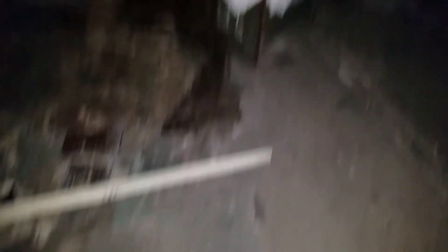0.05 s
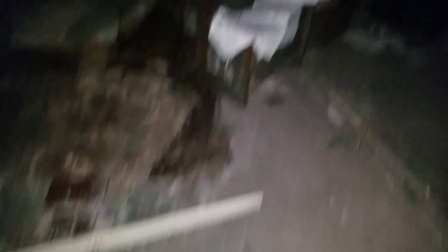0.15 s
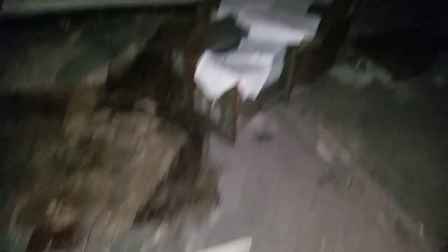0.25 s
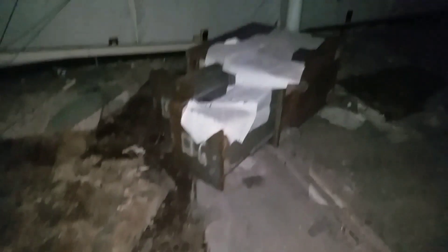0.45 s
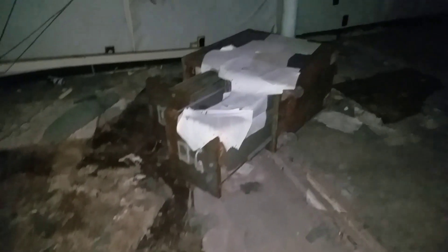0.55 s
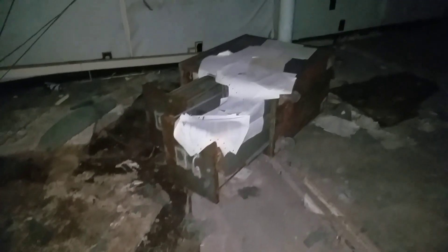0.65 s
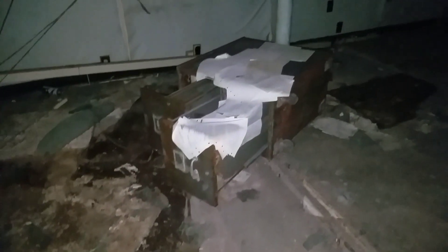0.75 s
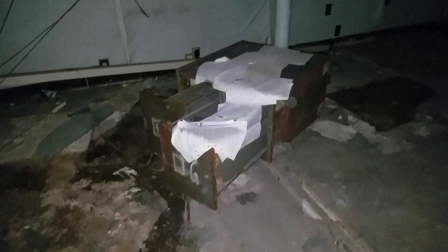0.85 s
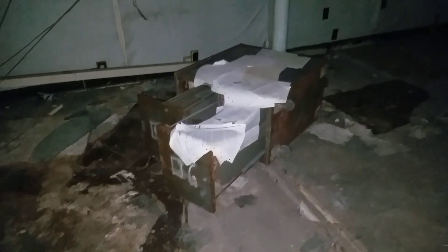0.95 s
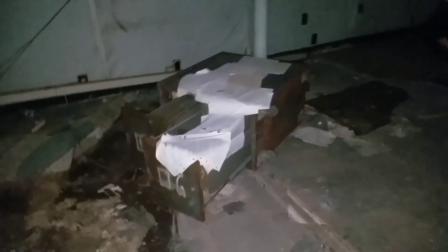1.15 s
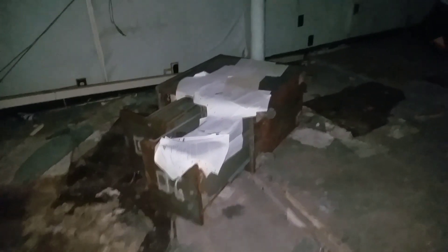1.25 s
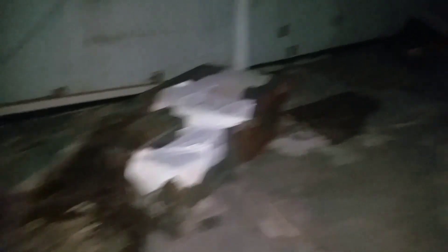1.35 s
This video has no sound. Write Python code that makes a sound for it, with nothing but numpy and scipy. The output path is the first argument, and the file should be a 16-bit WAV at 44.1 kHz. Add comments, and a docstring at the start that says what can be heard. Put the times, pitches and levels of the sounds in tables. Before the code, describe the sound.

Close by, a shoe breaks dry fragments on a hard floor, sharp snaps ringing off bare walls; the echo fades to near silence before a faint dry click, soft knock and short scuff.

```python
"""A shoe comes down on brittle debris on bare concrete: noise-burst fractures ring short modes, ticks settle.
Later the other foot shifts with a dry snap, a soft knock of decaying sines and a short scuff of noise.
A large empty room answers with diffuse noise tails that follow the power of each band.
Beneath lie a quiet air floor, a faint far hum and, at the start, the dying echo of an earlier step."""
import sys
import numpy as np
from scipy import signal
from scipy.io import wavfile
from scipy.ndimage import uniform_filter1d

SR = 44100
rng = np.random.default_rng(int(sys.argv[2]) if len(sys.argv) > 2 else 0)


def store_wav(level_fs):
    """Save 16-bit WAV to argv[1]."""
    pcm = np.round(np.clip(np.atleast_2d(level_fs), -1, 1) * 32767)
    wavfile.write(sys.argv[1], SR, pcm.T.astype(np.int16))


def volts_from_db(level):
    """Convert decibel levels to linear amplitude ratios."""
    exponent = np.asarray(level, float) / 20
    return 10 ** exponent


N = 61739

# decay of the empty room: (f/Hz, t60/s)
ROOM_T60 = [(300, 0.86), (1200, 0.6), (2500, 0.6), (15000, 0.56)]


def read(points, hz):
    """Reads a table on a log-frequency axis."""
    f, value = np.transpose(points)
    return np.interp(np.log(hz + 1), np.log(f + 1), value)


def curve(points):
    """Turns a (t/s, level/dB) curve into gain per sample."""
    s, db = np.transpose(points)
    return volts_from_db(np.interp(np.arange(N) / SR, s, db, left=-120))


def evened(x):
    """Sets rms to 1."""
    return x / np.sqrt(np.mean(x ** 2) + 1e-20)


def add(mix, s, sound, pan_db):
    """Places a two-channel sound; pan_db is left over right."""
    part = mix[:, round(s * SR):][:, :sound.shape[1]]
    part += sound[:, :part.shape[1]] * volts_from_db([[pan_db / 2], [-pan_db / 2]])


def diffuse(tone, decays=None, patchy_db=0., size=512, pan=None, shape=1):
    """Two-channel noise from random short-time spectra, alike in the bass, optionally dying by band."""
    # left-right likeness of diffuse sound: (f/Hz, correlation)
    likeness = [(60, 0.98), (380, 0.68), (2380, -0.13), (15000, -0.033)]
    hop = size // 4
    frames, hz = N // hop + 5, np.fft.rfftfreq(size, 1 / SR)
    a, b, c, d, patches = rng.standard_normal((frames, len(hz), 5)).T
    same = np.clip(read(likeness, hz), -1, 1)[:, None]
    left, other = a + 1j * b, c + 1j * d
    z = np.array([left, same * left + np.sqrt(1 - same ** 2) * other])
    patches = uniform_filter1d(patches, size=12, axis=0)  # over frequency
    patches = uniform_filter1d(patches, size=8, axis=1)  # over time
    db = read(tone, hz)[:, None] + patchy_db * evened(patches)
    if pan:
        z *= volts_from_db(np.array([.5, -.5])[:, None, None] * read(pan, hz)[:, None])
    if decays:
        db = db - 60 * np.arange(frames) * hop / SR / read(decays, hz)[:, None]
    return signal.istft(z * volts_from_db(db) * shape, nperseg=size, noverlap=size - hop)[1][:, :N]


def air():
    """Still air and hiss: steady coloured noise."""
    # floor colour: (f/Hz, level/dB per Hz)
    air_tone = [(14, -38), (40, -5.5), (60, -5.5), (110, -12.5), (140, -9), (200, -13.5), (330, -10.5),
                (900, -20), (2000, -14), (3200, -24.5), (6000, -29.5), (9500, -35.5), (13000, -28.5),
                (15800, -32.5)]
    # floor balance: (f/Hz, left-right/dB)
    air_pan = [(100, -0.5), (3000, 6), (15000, -1)]
    rms_db = -57.5
    return volts_from_db(rms_db) * evened(diffuse(air_tone, size=2048, pan=air_pan))


def far_hum():
    """Faint sines whose phase wanders; each fades at 60 dB/s after its hold."""
    # hum partials, sine peak 1 dB above level: (f/Hz, level/dB, hold/s)
    partials = [(95.8, -63, 0.573), (331.6, -66.5, 0.81)]
    t, hum = np.arange(N) / SR, 0
    wander_rad = 0.94  # rms before the last smoothing
    for hz, db, until in partials:
        wander = wander_rad * evened(uniform_filter1d(rng.standard_normal(N), size=4000))
        phase = 2 * np.pi * hz * t + uniform_filter1d(wander, size=800)
        hum += volts_from_db(db + 1 - 60 * np.maximum(t - until, 0)) * np.sin(phase)
    return hum


def earlier_echo():
    """The echo of an earlier step: diffuse noise dying at the room's decay from the start."""
    # echo colour: (f/Hz, level/dB per Hz)
    echo_tone = [(59, -49), (100, -3), (1730, -7), (1880, -6), (15500, -42.5)]
    start_rms_db = -49
    echo = diffuse(echo_tone, ROOM_T60)
    return echo * volts_from_db(start_rms_db) / np.sqrt(np.mean(echo[:, :2000] ** 2))


def crack(ring_hz, body_hz, body_db, treble_db, top_db, crumble_ms, free):
    """A burst of tiny fractures rings the debris modes, the nearest two moved to the fragment's own pitches."""
    # debris modes: (f/Hz, level/dB, time/s to fall 90 dB at free = 1, left phase lead/rad)
    debris_modes = [(470, -8, 0.015, 1), (793, 1.5, 0.012, 0.23), (1262, -4, 0.018, 0.8),
                    (1808, -4.5, 0.013, 0.4), (2247, 4.5, 0.0089, -0.6), (2815, -0.5, 0.011, -0.5),
                    (3510, 1, 0.0089, 0.89), (4368, -1, 0.0059, 2.5), (4930, -5.5, 0.0036, 3.5),
                    (5820, 3, 0.0016, 1.64), (6936, 5, 0.0029, -1.2), (9170, -5.5, 0.0064, 2),
                    (12050, 2.5, 0.002, -1), (13270, 0.5, 0.0036, 5), (14650, -2.5, 0.013, 0.8)]
    body_below_hz, treble_above_hz, top_above_hz = 1400, 4400, 11000
    off_ring_db_per_oct, off_body_db_per_oct = 29.5, 10.5
    detune, turn_spread_rad = .02, 0.6
    t = np.arange(1400) / SR
    u = t * 1000 / max(crumble_ms, .05)
    burst = u ** 2 * np.exp(-2 * u) * rng.standard_normal(len(t))
    out = np.zeros((2, len(t)))
    chance = rng.standard_normal((len(debris_modes), 2))
    modes = np.array(debris_modes)
    for own_hz in (ring_hz, body_hz):
        modes[np.argmin(abs(np.log(modes[:, 0] / own_hz))), 0] = own_hz
    for (hz, db, fall_s, lead), (a, b) in zip(modes, chance):
        if hz < body_below_hz:
            db = db + body_db - off_body_db_per_oct * abs(np.log2(hz / body_hz))
        elif hz > treble_above_hz:
            db = db + (top_db if hz > top_above_hz else treble_db)
        else:
            db = db - free * off_ring_db_per_oct * abs(np.log2(hz / ring_hz))
        decay = volts_from_db(-90 * t / fall_s / max(free, .1))
        mode = t * decay * np.exp(2j * np.pi * hz * (1 + detune * a) * t)
        ring = signal.fftconvolve(burst, mode)[:len(t)]
        half = (lead + turn_spread_rad * b * min(hz / 3000, 1)) / 2
        turned = ring / abs(ring).max() * np.exp(1j * np.array([[half], [-half]]))
        out += volts_from_db(db) * turned.real
    return out / abs(out).max()


def debris():
    """The single cracks, and the part of them that reaches the walls."""
    # cracks: (t/s, peak/dB before panning, own ring f/Hz, low body f/Hz, low body/dB, treble/dB, glassy top/dB,
    # crumble time to burst peak/ms, freedom to ring (1 = free), left-right/dB)
    cracks = [(0.1707, -23.5, 2890, 1350, -3, -15.5, -24, 0.11, 0.34, 20.5),
              (0.2089, -32, 2720, 800, -14, -14, -12, 0.67, 0.6, 5),
              (.2290, -18, 2150, 790, -25, -13, -8, 1.08, 0.94, 0.5),
              (.2370, -11.5, 2400, 1270, 0.5, -32, -40, .3, 0.7, -2),
              (.2392, -18.5, 2150, 730, 7, -20, -30, 0.67, 1.1, 0.5),
              (0.2577, -5.5, 3510, 750, 1, -28, -32, 0.2, 0.83, 0.5),
              (0.2615, -8.5, 2250, 790, -13.5, -6.5, -6.5, 2.33, 0.94, -2),
              (.3063, -11, 2383, 1130, -10.5, -26, -27, .2, 0.82, 1.5),
              (0.309, -19.5, 2870, 630, -13, -9, -27, 0.27, 0.9, -2.5),
              (.3888, -24, 2085, 1100, -1, -11.5, -16, .12, 0.73, -2.5),
              (0.4498, -8, 3380, 1270, -13.5, -3.5, -5.5, 0.23, 0.5, -1.3),
              (.4522, -22.5, 2497, 754, 0, -6, -1, .5, 0.87, 0.5),
              (.4597, -34, 2480, 1310, -8, -3, -6, .6, .7, 10),
              (0.4659, -31.5, 3020, 820, -16, 5, -3, 0.59, .8, -25),
              (.513, -41, 2400, 800, -26, 2, 0, 1.8, 1, -21),
              (.636, -45, 2500, 820, -11, -5, -2, 1.2, 1, -8),
              (.861, -42, 2030, 653, 6, -15, -26, 0.58, 0.75, 4.5),
              (1.1943, -21.5, 1884, 710, 0, -6, -18, 0.13, 0.35, 12)]
    pinned_room_db = -10  # pieces pinned under the sole ring short and broad, shielded from the room
    mix, sent = np.zeros((2, N)), np.zeros((2, N))
    for s, peak_db, *colour, free, pan_db in cracks:
        sound = volts_from_db(peak_db) * crack(*colour, free)
        add(mix, s, sound, pan_db)
        add(sent, s, sound * volts_from_db(pinned_room_db * max(1 - free, 0)), pan_db)
    return np.array([mix, sent])


def crumbs():
    """Small random ticks as crumbs settle, each one of eight little cracks."""
    # crushed and settling crumbs: (t/s, level/dB)
    grit = [(.205, -54), (.225, -37), (.25, -34.5), (.3, -39.5), (.4, -52.5), (.6, -68), (1.4, -79)]
    ticks_per_s, spread_db = 1500, 4.5
    size = volts_from_db(spread_db * np.minimum(rng.exponential(1, N), 4))
    size = size * (rng.random(N) < ticks_per_s / SR)
    kind, out = rng.integers(0, 8, N), np.zeros((2, N))
    for k, hz in enumerate(np.geomspace(1700, 3600, num=8)):
        tick = crack(hz, 780, -7.5, -12.5, -15.0, 0.33, 0.64)
        out += signal.oaconvolve((size * (kind == k))[None], tick, axes=1)[:, :N]
    return out * curve(grit) / volts_from_db(spread_db)


def scuff():
    """A short gritty scuff: patchy noise under a level curve."""
    # scuff envelope: (t/s, level/dB)
    scuff_level = [(1.2, -80), (1.212, -57), (1.22, -46), (1.245, -54), (1.268, -63.5), (1.28, -82)]
    # scuff colour: (f/Hz, level/dB per Hz)
    scuff_tone = [(180, -27), (300, -4), (590, -12), (5210, -5.5), (15500, -40)]
    gone = np.arange(N) / SR < scuff_level[-1][0]  # silent after the last point
    noise = evened(diffuse(scuff_tone, patchy_db=3.0, size=256))
    return noise * curve(scuff_level) * gone * volts_from_db([[2.5], [-2.5]])


def knock():
    """A dull knock of the sole on concrete: low modes that swell over one cycle and decay."""
    # knock modes: (f/Hz, level/dB before panning, t60/s)
    knock_modes = [(148, -37, 0.026), (272, -33.5, 0.012), (474, -31, 0.011), (1190, -36.5, 0.011)]
    start_s, pan_db = 1.2135, 18
    t, mix = np.arange(3000) / SR, np.zeros((2, N))
    thud = np.zeros(len(t))
    for hz, db, t60 in knock_modes:
        thud += np.minimum(t * hz, 1) * volts_from_db(db - 60 * t / t60) * np.sin(2 * np.pi * hz * t)
    add(mix, start_s, np.array([thud, thud]), pan_db)
    return mix


def room(x):
    """Bare walls: each band's power feeds a diffuse tail that builds up fast and dies at its own speed."""
    # colour of the reverberation: (f/Hz, level/dB)
    room_tone = [(170, -32), (400, 2), (1200, -0.5), (2500, 0.5), (6000, 2), (9500, 0.5), (15000, 3)]
    room_db, early_db, early_t60_s, build_s = -3.5, 8, 0.087, 0.0018
    blur_oct = 0.34  # many unlike reflections even out the colour of a crack
    hz, t, z = signal.stft(np.pad(x, ((0, 0), (0, 320))), SR, nperseg=256, noverlap=192)
    blur = np.exp(-.5 * (np.log2((hz[:, None] + 200) / (hz + 200)) / blur_oct) ** 2)
    power = blur @ (abs(z) ** 2).mean(0) / blur.sum(1)[:, None]
    late = volts_from_db(-60 * t / read(ROOM_T60, hz)[:, None])
    early = 1 + volts_from_db(early_db - 60 * t / early_t60_s)
    tail = late * early * np.minimum(t / build_s, 1) ** 2
    tail_power = tail ** 2 / (tail ** 2).sum(1)[:, None]
    held = signal.fftconvolve(power, tail_power, axes=1)[:, :N // 64 + 5]
    return volts_from_db(room_db) * diffuse(room_tone, size=256, shape=np.sqrt(abs(held)))


def scene():
    """Steps, their room, the air, the hum and the earlier echo."""
    low_cut_hz, shoe_room_db = 418, -7
    no_bass = signal.butter(4, low_cut_hz, "high", fs=SR, output="sos")  # small fragments radiate no bass
    near, sent = signal.sosfilt(no_bass, debris() + crumbs())
    close = scuff() + knock()
    floor = air() + far_hum() + earlier_echo()
    return near + close + room(sent + volts_from_db(shoe_room_db) * close) + floor


def roll_off(x):
    """The treble ends steeply here."""
    return signal.sosfilt(signal.butter(12, 17000, fs=SR, output="sos"), x)


def record(dry):
    """Cuts the treble edge and adds a small steady offset."""
    edge_hz, offset = 16200, -0.00087
    low_pass = signal.firwin(255, edge_hz, window=("kaiser", 6), fs=SR)
    edged = signal.oaconvolve(dry, low_pass[None], "same")
    return roll_off(edged + offset)


dry = scene()
out = record(dry)
store_wav(out)
```